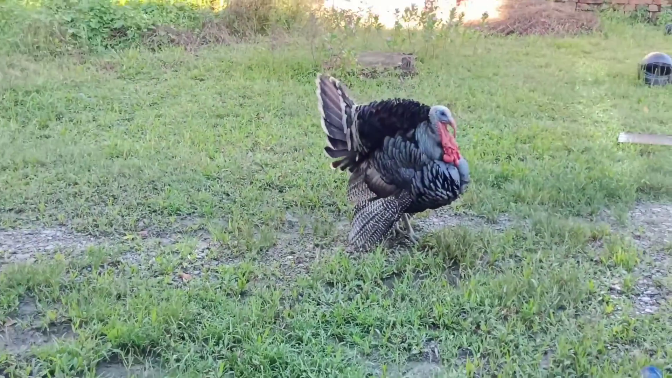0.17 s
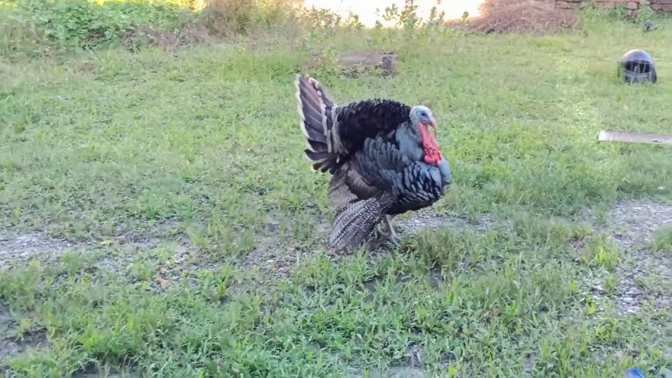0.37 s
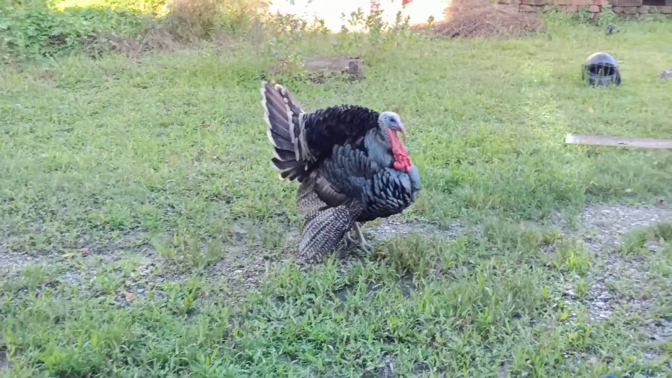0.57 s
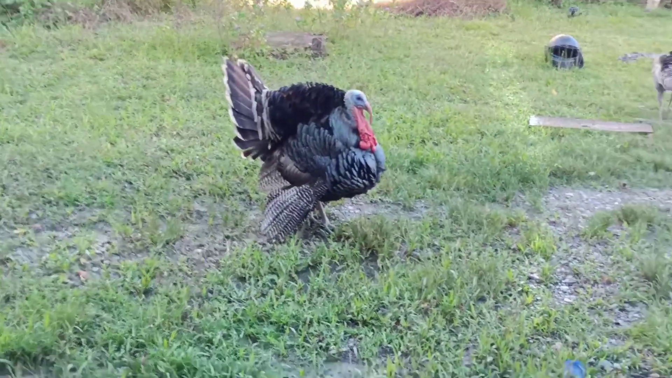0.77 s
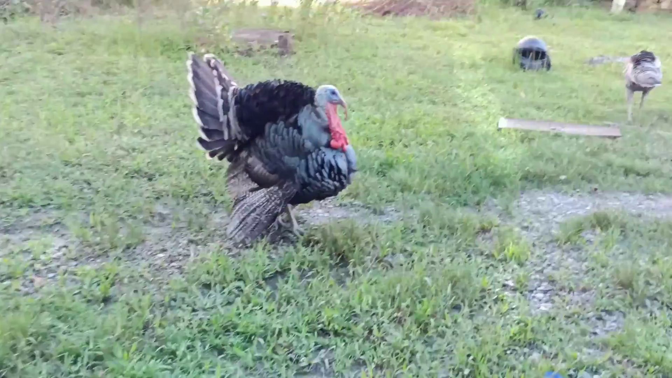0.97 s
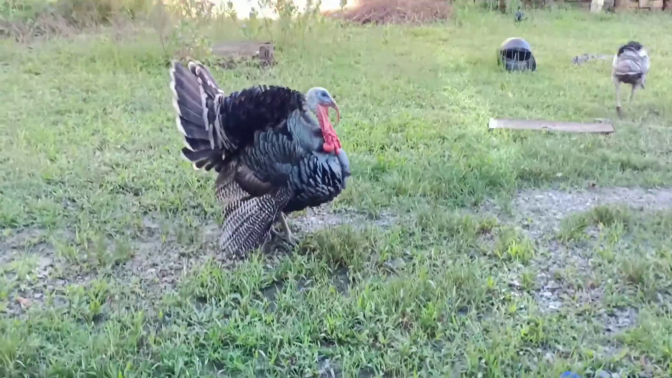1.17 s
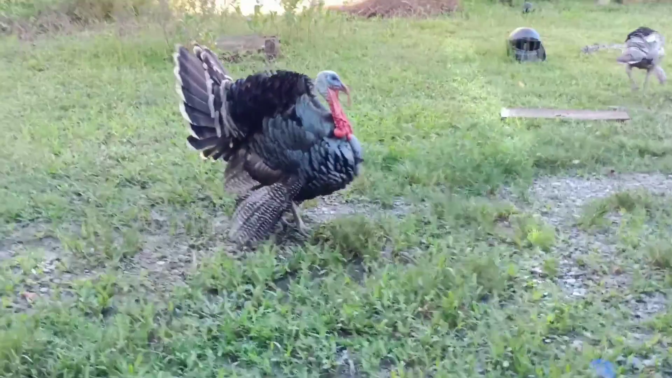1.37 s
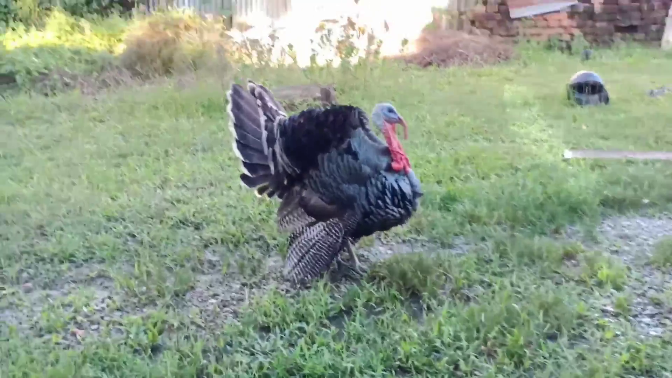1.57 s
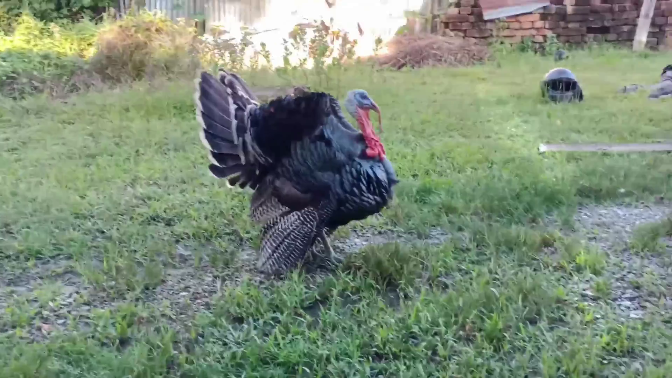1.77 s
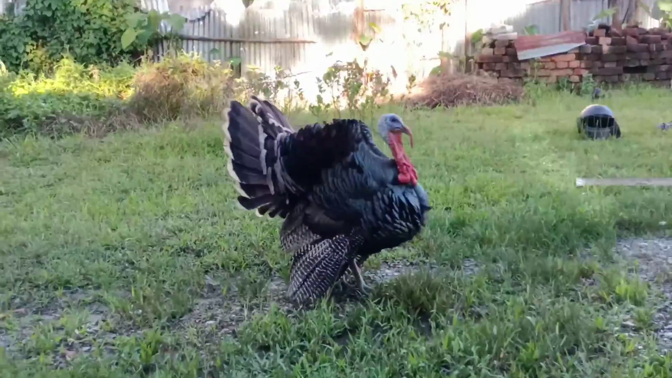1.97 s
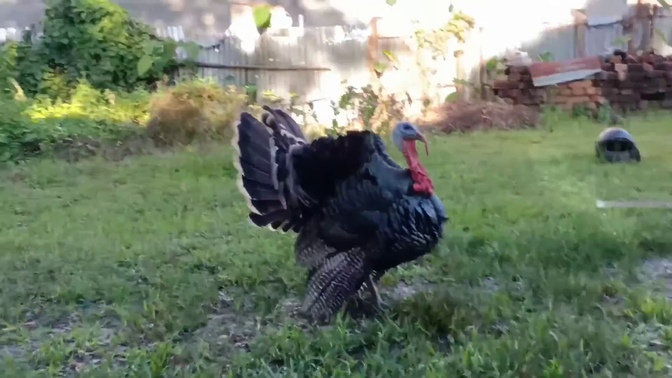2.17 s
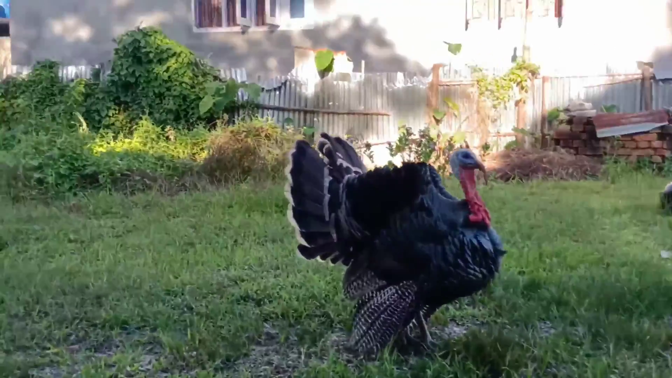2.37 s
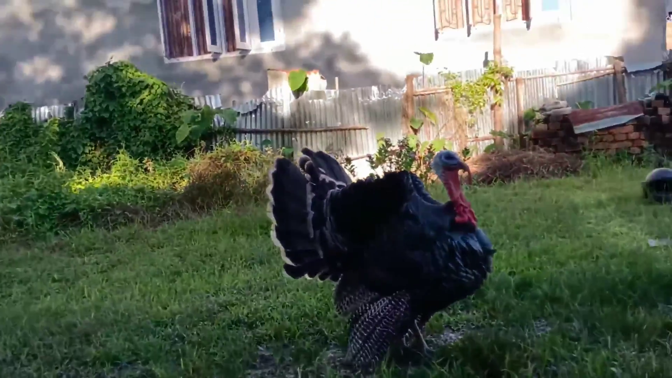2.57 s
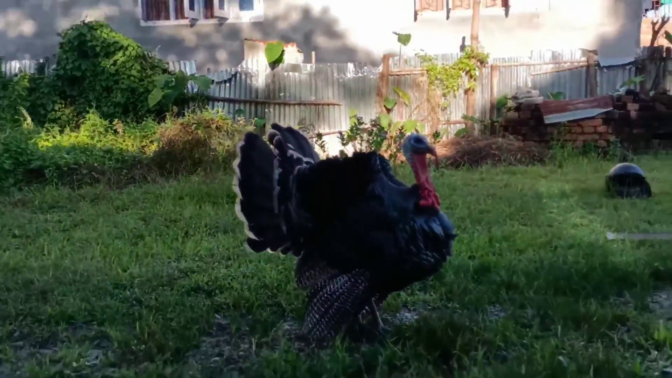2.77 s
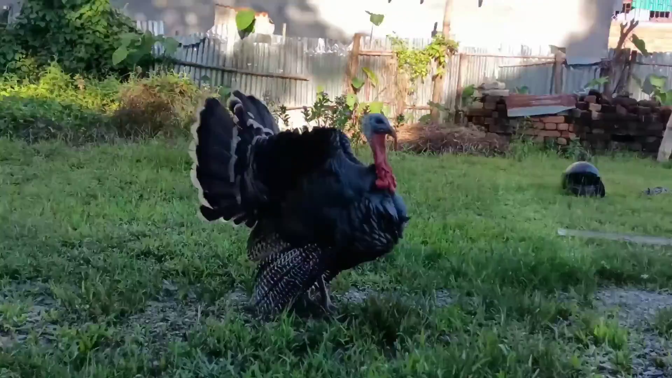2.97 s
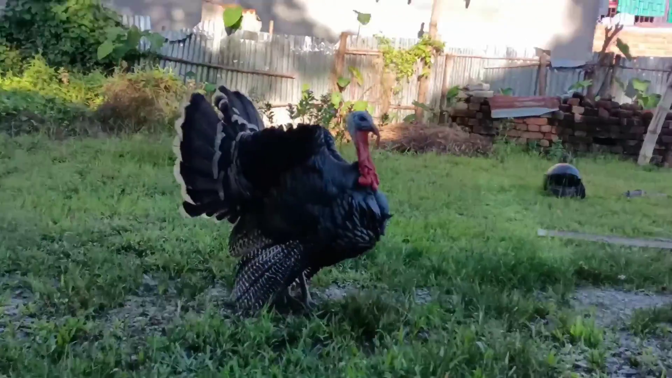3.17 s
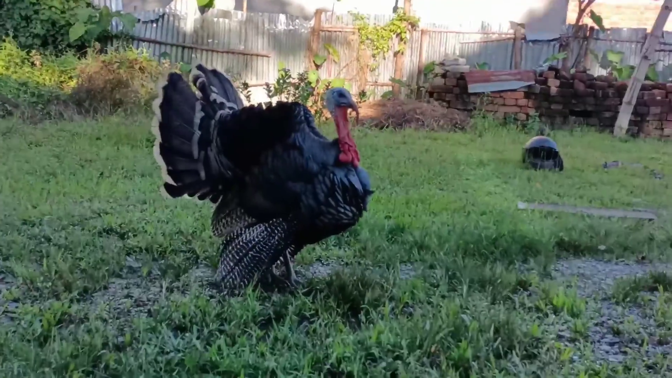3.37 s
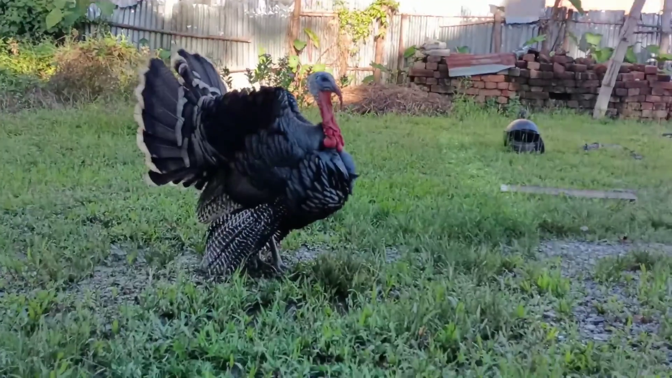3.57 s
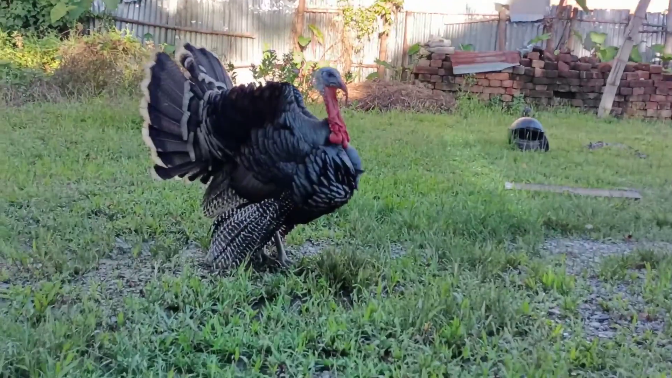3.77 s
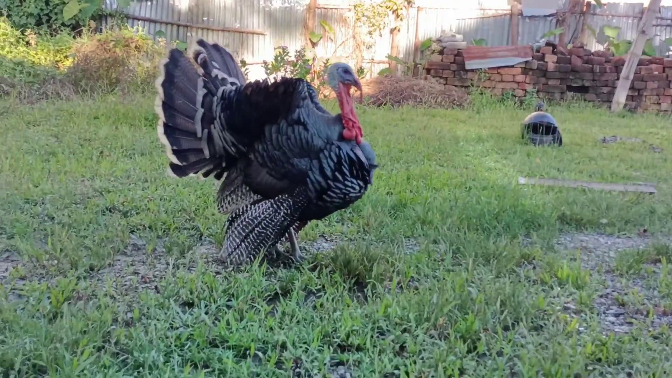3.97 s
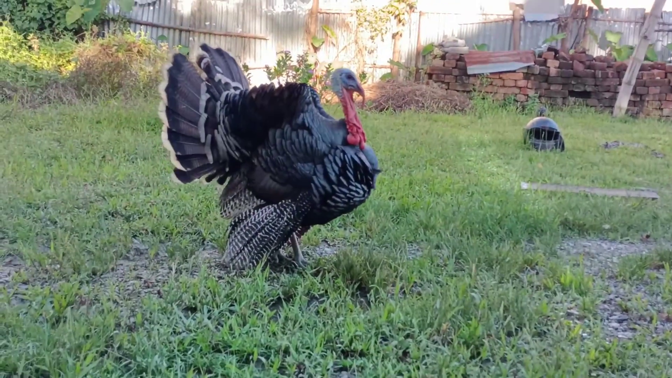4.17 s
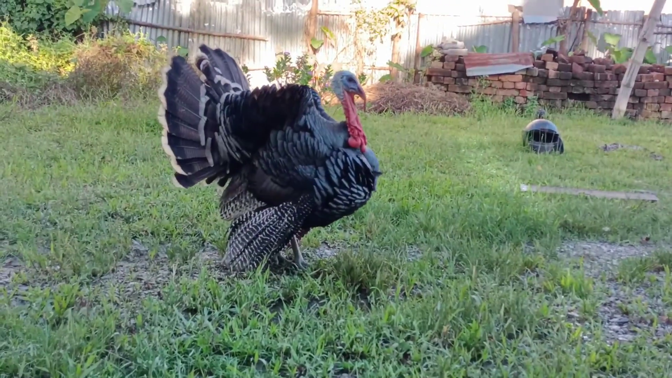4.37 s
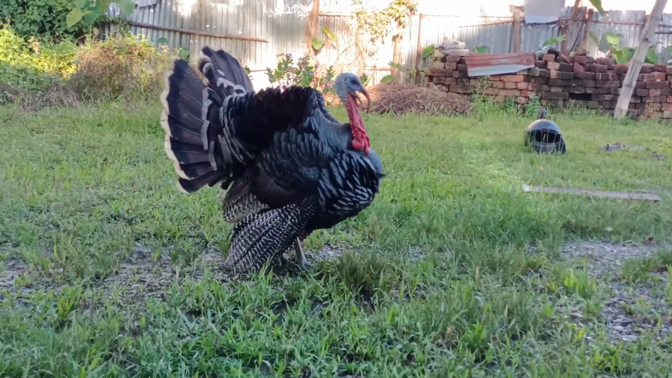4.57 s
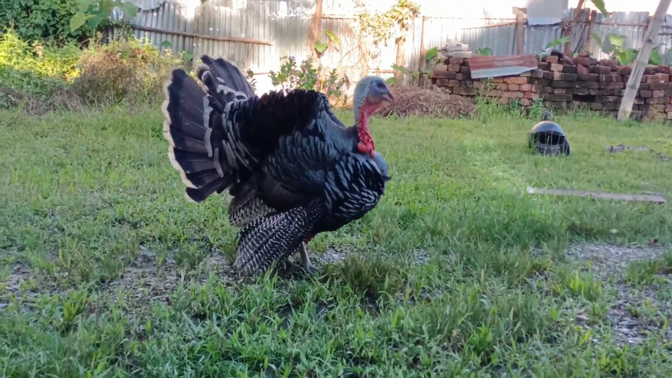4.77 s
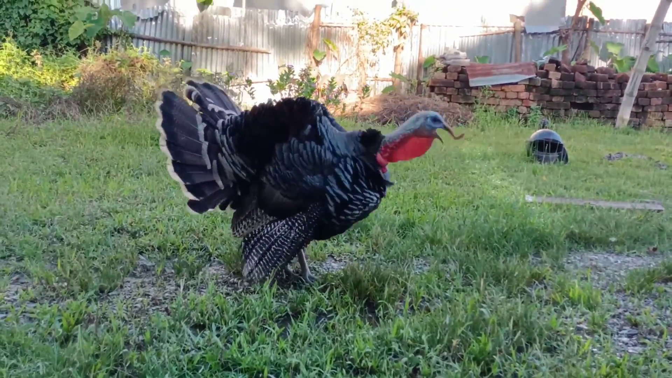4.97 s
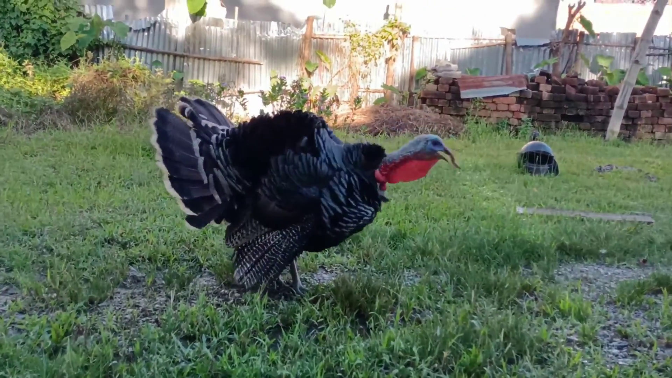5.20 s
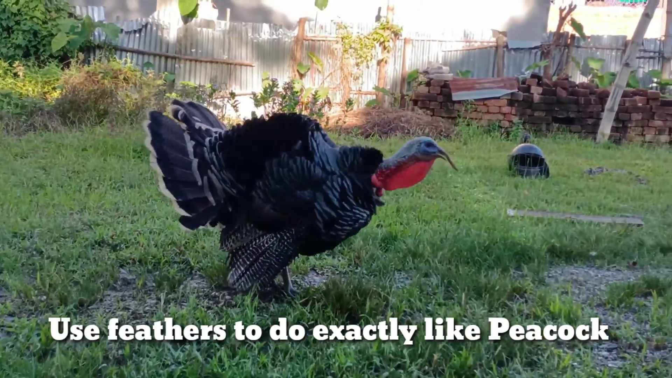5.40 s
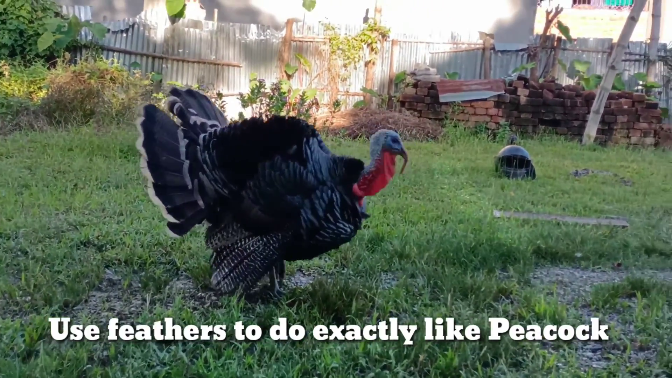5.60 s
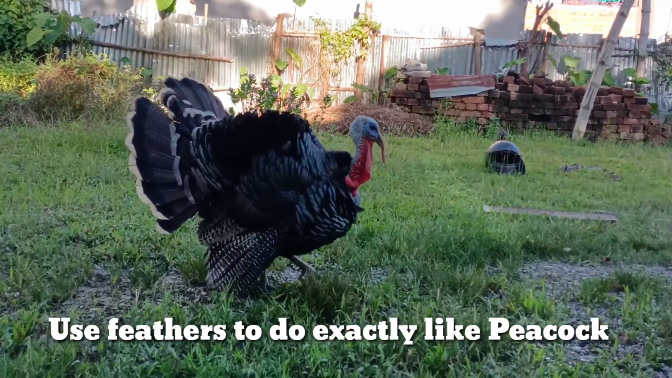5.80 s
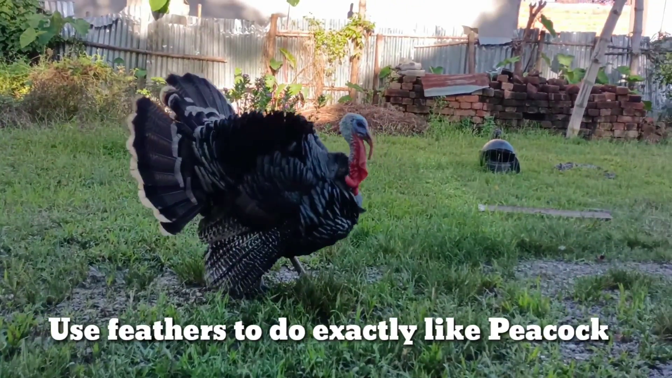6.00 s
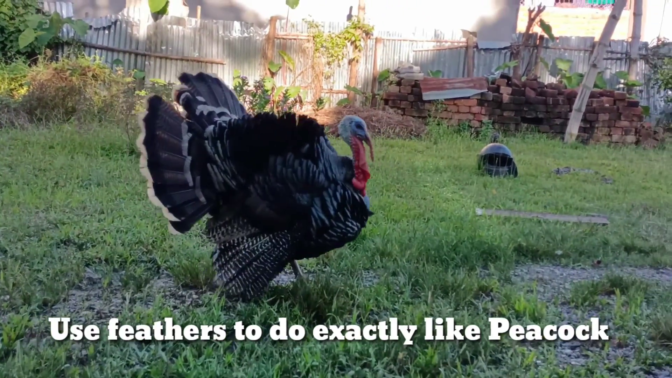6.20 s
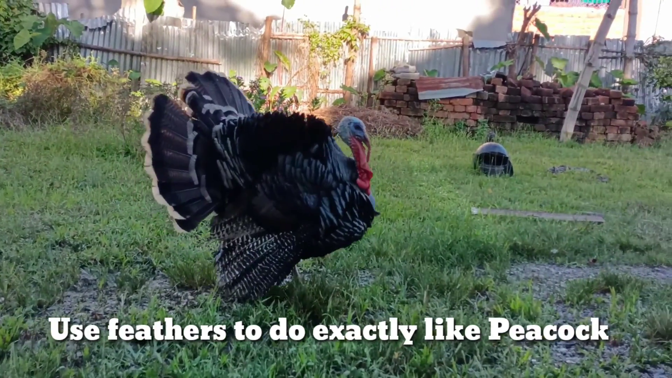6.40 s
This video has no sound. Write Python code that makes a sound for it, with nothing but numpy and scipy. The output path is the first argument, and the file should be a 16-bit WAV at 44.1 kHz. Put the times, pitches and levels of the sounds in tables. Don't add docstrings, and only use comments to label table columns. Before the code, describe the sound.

A quiet open grassy yard heard through a handheld stereo phone, brighter on the right. From 0 to 2.4 seconds there is low wind, faint distant rumble, a thin steady insect hiss at left, tiny far bird whistles, and feet swishing and crunching grass, with a strong crackle on the right at 1.9. At 2.46 a very loud, dry, bright click strikes the left side. From 2.6 to 4.5 a hen turkey gives seven short yelps about 0.3 seconds apart, the first faint and high, later ones lower and fuller, falling and mostly flipping up hoarsely; small snaps and dull thumps intrude. At 4.7 a close tom erupts in a loud, rapid, throaty gobble, two rolls of syllables fading by 5.5, with short diffuse echoes. A hoarse far cry follows around 5.6, with low handling thumps, gusts and light clicks until 6.4, the background briefly subdued.

```python
import sys
import numpy as np
from scipy import signal
from scipy.fft import rfft, irfft, next_fast_len
from scipy.io import wavfile
from scipy.ndimage import uniform_filter1d, map_coordinates

SR = 44100
rng = np.random.default_rng(int(sys.argv[2]) if len(sys.argv) > 2 else 0)


def bounce(signal):
    frames = np.transpose(np.atleast_2d(signal))
    limited = np.clip(frames, -1, 1)
    pcm = np.round(limited * 32767).astype(np.int16)
    wavfile.write(sys.argv[1], SR, pcm)


def voltage_ratio(decibels):
    exponent = np.asarray(decibels, float) / 20
    return 10 ** exponent


N = 284136

# (time [s], level [dB])
GUST_LEVEL = [(0, -63.5), (.6, -71), (2.0, -68), (2.7, -62), (3.24, -56.5), (4.5, -61), (4.7, -47.5),
              (5.6, -55), (5.75, -70.5), (6.0, -52), (6.44, -63.5)]
# (time [s], level [dB])
STEPPING_LEVEL = [(0, -60.5), (.54, -57.5), (.85, -45.5), (1.16, -49), (1.41, -53), (1.7, -50.5),
                  (1.99, -47.5), (2.29, -56), (2.69, -56.5), (3.24, -63.5), (3.54, -56), (4.5, -67.5),
                  (6.44, -56)]
# (frequency [Hz], density [dB per Hz])
WIND_SPECTRUM = [(12, -10), (30, -5.5), (60, -4.5), (105, 2), (135, -3), (200, -12.5), (400, -40)]
# (frequency [Hz], density [dB per Hz])
RUMBLE_SPECTRUM = [(82, -34.5), (140, 1), (292, -1), (479, 2), (640, -6), (1170, -13), (1370, -26),
                   (1830, -13.5), (2500, -14), (3250, -30), (5500, -120)]
# (frequency [Hz], density [dB per Hz])
RUSTLE_SPECTRUM = [(710, -39.5), (1200, -12.5), (1650, -16), (1900, -17.5), (2420, -7), (4990, -11),
                   (6220, -3.5), (8000, -16.5), (10100, 1.5), (12400, -14), (14900, -18.5), (15800, -29),
                   (16500, -64)]
# (frequency [Hz], density [dB per Hz])
INSECT_SPECTRUM = [(7500, -31), (8800, -6.5), (9600, 3.5), (10300, 9), (10900, 0.5), (11500, -11.5),
                   (12800, -38)]
RUMBLE_DB, INSECT_DB = -64.5, -53
DUCK_FROM_DB, DUCK_SHARE, DUCK_RECOVER_DB_PER_S = -51, 0.11, 12.5

# (frequency [Hz], left minus right [dB])
PORT_DIFFERENCE = [(200, 0.5), (1200, 0.5), (2500, -3), (4000, -9), (6000, -20), (7500, -6), (10000, 13.5),
                   (15000, -16)]
# (frequency [Hz], gain [dB])
HOUSING_RING = [(1000, 0.5), (4500, -6.5), (6100, 2), (7600, -13), (9400, -3.5), (13000, -11), (16000, 1)]

# (start [s], length [s], frequency [Hz], level
# [dB])
FAR_WHISTLES = [(2.62, .14, 2060, -70), (.66, .18, 1660, -72), (1.19, .14, 1660, -74),
                (1.23, .07, 2500, -73), (.24, .11, 1220, -72), (.36, .05, 1125, -71), (.32, .12, 1670, -77),
                (.35, .07, 2550, -73), (2.22, .12, 2530, -71), (.17, .06, 5600, -69), (.18, .05, 4350, -67),
                (2.515, .07, 1275, -66)]
# (start [s], length [s], start frequency [Hz], level [dB])
FAR_CRIES = [
    (1.39, .35, 3050, -65),
    (3.78, .27, 3450, -59),
    (5.55, .24, 3650, -62),
    (5.48, .22, 5200, -66),
]
# (start [s], length [s], level [dB])
GRASS_SWISHES = [
    (1.13, .12, -59),
    (1.85, .15, -58),
    (0, .07, -63),
]
WHISTLE_SAG, CRY_SAG = .985, .83
WHISTLE_BLUR, CRY_BLUR = .025, .33
SWISH_HZ = 5600

# (time [s], peak [dB], frequency [Hz],
# swell [s])
LOW_THUMPS = [(1.351, -62, 197, 0.0087), (1.531, -57, 184, 0.0093), (2.005, -61.5, 108, 0.0167),
              (2.169, -48.5, 115, 0.0066), (2.47, -41, 129, 0.0087), (2.546, -52.5, 111, 0.0375),
              (2.716, -60, 116, 0.0124), (2.872, -68, 121, 0.0186), (3.203, -59.5, 208.7, 0.0059),
              (3.205, -46, 101, 0.0072), (3.409, -42.5, 100, 0.0071), (4.079, -42.5, 124, 0.0106),
              (4.472, -58, 134, 0.0086), (4.682, -33.5, 111, 0.0112), (4.979, -32, 108, 0.0147),
              (5.175, -32.5, 78.1, 0.0096), (5.396, -36, 118, 0.01085), (5.659, -50.5, 97, 0.013),
              (5.728, -51.5, 104.6, 0.0158), (5.926, -34, 134, 0.00455), (6.002, -44.5, 102, 0.01013),
              (6.18, -52.5, 116.3, 0.013)]
# (time [s], peak [dB], left minus right [dB], low edge [Hz], high edge [Hz])
DRY_SNAPS = [(0.598, -54, -19.5, 100, 1480), (1.498, -38.5, -32, 5450, 13140),
             (2.459, -1.5, 14, 5710, 13010), (2.4587, -19.5, -16, 2873, 4900),
             (2.8874, -33.5, -28, 30.3, 1590), (2.8871, -31.5, -35.5, 4200, 14400),
             (3.1581, -35, -30, 60, 8720), (3.254, -36, 19.5, 150, 1480), (3.3829, -23, -28.5, 9070, 15970),
             (3.383, -38.5, 14.5, 2000, 7000), (3.46, -49, 10, 500, 2900), (4.329, -44, -26.5, 300, 6800),
             (5.932, -56, 10.5, 101.7, 672), (6.28, -44.5, -1, 4960, 14630),
             (6.347, -48.5, -9.5, 3937, 14800)]
# (time [s], peak [dB], low edge [Hz], high edge [Hz], T60 [s])
GRASS_CRUNCHES = [
    (0.2121, -36, 3080, 8840, 0.082),
    (0.646, -44, 2660, 7700, 0.038),
    (1.55, -43, 200, 5220, 0.111),
    (1.58, -43.5, 900, 15060, 0.061),
    (1.91, -17.5, 3155, 8150, 0.0287),
    (1.931, -32.5, 305, 6740, 0.118),
    (1.96, -42.5, 422, 1500, 0.026),
    (2.287, -46, 1500, 6980, 0.032),
    (2.482, -36, 4540, 15260, 0.077),
    (5.236, -38.5, 86.5, 347, 0.31),
]
SNAP_T60_S, CRUNCH_PAN_DB = 0.00631, -15.5

YARD_T60_S, YARD_DB = 0.4123, -10
GROUND_T60_S, GROUND_DB = 0.0562, -2

ANCHOR_PARTIALS = [1, 2, 4.0, 8.5]

# (start [s], length [s], peak [dB], start frequency [Hz], lowest frequency [Hz])
HEN_YELPS = [
    (2.568, 0.1445, -50, 1212, 1001),
    (2.894, 0.123, -40, 1280, 972.6),
    (3.168, 0.1409, -35, 964.2, 805.5),
    (3.455, 0.1379, -33, 958.4, 808.5),
    (3.758, 0.1435, -36.5, 995.4, 819.3),
    (4.068, 0.1307, -37, 995.1, 853.4),
    (4.382, .105, -38, 993.3, 902.8),
]
# (share of its length, chest, throat, mouth, rasp, half pitch; each re peak [dB])
YELP_COURSE = [
    (0, -16.5, -41, -28.5, -58.5, -31),
    (.19, -6.5, -19.5, -28, -31.5, -38.5),
    (.26, -6.5, -8, -14, -15.5, -49.5),
    (.7, 1.5, -21, -15, -20, -10),
    (1, -18, -20.5, -36.5, -30, -49.5),
]
# (frequency [Hz], gain [dB])
HEN_RESONANCES = [(1500, -4.5), (3300, 2), (4200, -12), (5000, -5.5), (5450, 10), (5900, -9), (6500, -5.5),
                  (8000, -35), (10000, -31), (16000, -44.5)]
FALL_HZ_PER_S, THIN_FALL_HZ_PER_S, SETTLE_HZ, REBOUND = 2000, 5500, 12, .02
THIN_ABOVE_HZ, THIN_DB_PER_OCTAVE, THIN_EVEN = 1057, 60, .5
HEN_HOARSE_END, HEN_HOARSE_THIN, HOARSE_PER_FALL, CLEAR_FALL = 1.3, .65, 13, 1.06
CLEAR_HALF_DB = 17.5
FLIP_AT, FLIP_S, FLIP_RATIO, FLIP_HZ, FLIP_DB = 0.62, 0.0809, 1.16, 1126.8, -13

# (start [s], end [s], peak [dB], start frequency [Hz], end frequency [Hz])
TOM_SYLLABLES = [(4.689, 4.749, -14, 646.2, 493), (4.747, 4.798, -28.5, 791.3, 797.6),
                 (4.799, 4.88, -4.5, 588, 720.7), (4.874, 4.941, -17, 731.4, 667.2),
                 (4.948, 5.01, -26, 714.6, 666.4), (5.001, 5.029, -18, 685.2, 591),
                 (5.031, 5.074, -11, 671.6, 581), (5.065, 5.122, -7, 599.8, 684.8),
                 (5.126, 5.161, -9.5, 684.7, 665.2), (5.168, 5.226, -24, 605.5, 503),
                 (5.223, 5.297, -26.5, 620.3, 510.5), (5.311, 5.338, -15, 566.6, 633),
                 (5.331, 5.4, -15, 628.5, 559.6), (5.4, 5.443, -28, 583.8, 506.7),
                 (5.438, 5.475, -36, 583.5, 501.3), (5.479, 5.55, -56, 633.1, 590.6)]
# (time [s], resonance of the gape [Hz], strain on the rasp [dB])
BEAK_GAPE = [
    [(4.70, 2581, -11), (4.74, 1507, -15), (4.80, 2300, -20), (4.835, 2133, -18), (4.866, 1296, -12.5),
     (4.89, 1225, 4), (4.93, 794, -10), (4.995, 855, -8.5)],
    [(5.01, 1303, -12.5), (5.026, 800, -15.5), (5.044, 1287, -26), (5.075, 1900, -13), (5.11, 1210, -8),
     (5.14, 648, -11.5), (5.25, 1007, -16), (5.335, 1107, -9.5), (5.41, 756, -16.5)],
]
# (frequency [Hz], gain [dB])
TOM_RESONANCES = [(1500, 0.5), (1900, 1), (2350, 5.5), (2950, 6), (3600, 6), (4600, -8.5), (5600, 0.5),
                  (6700, -11.5), (7700, -24.5), (9300, -22.5), (14900, -26), (16000, -29.5)]
SWELL_DB, RISE_FROM, RISE_TO = 12.5, .37, .88
ONSET_S, ONSET_DB, DYING_S, MURMUR_DB = .012, 10, 0.0515, -43.5
GAPE_DB_PER_OCTAVE, GAPE_DEPTH_DB, MOUTH_DB = 17, 23, -3
SAC_DB, SAC_FOLLOWS = -17, .5
TOM_CLEAR_DB, TOM_BARK_DB = -8, -34


def rms_one(x):
    return x / np.sqrt(np.mean(x ** 2) + 1e-20)


def at_hz(points, hz):
    table = np.array(points)
    return np.interp(np.log(hz + 1), np.log(table[:, 0]), table[:, 1])


def in_time(rows, t):
    s, *columns = np.transpose(rows)
    return [np.interp(t, s, column) for column in columns]


def colour(x, points, share=1):
    size = next_fast_len(N + 4096)
    hz = np.arange(size // 2 + 1) * SR / size
    return irfft(rfft(x, size) * voltage_ratio(share * at_hz(points, hz)), size)[..., :N]


def drift(rate, count=N):
    knots = rng.standard_normal(int(count * rate / SR) + 3)
    return map_coordinates(knots, [np.arange(count) * rate / SR], order=3)


def ports(x):
    left, right = x * np.ones((2, 1))
    return np.array([colour(left, PORT_DIFFERENCE, share=0.87), colour(right, PORT_DIFFERENCE, share=-0.2902)])


def wind():
    gust_db, = in_time(GUST_LEVEL, np.arange(N) / SR)
    turbulence = rng.standard_normal(N) + .45 * rng.standard_normal((2, N))
    return rms_one(colour(turbulence, WIND_SPECTRUM)) * voltage_ratio(gust_db + 3 * drift(16))


def rumble():
    noise = rng.standard_normal(N) + 0.73 * rng.standard_normal((2, N))
    return rms_one(colour(noise, RUMBLE_SPECTRUM)) * voltage_ratio(RUMBLE_DB + 2.8 * drift(3.3))


def rustle():
    step_db, = in_time(STEPPING_LEVEL, np.arange(N) / SR)
    grains = rng.standard_normal((2, N)) * voltage_ratio(2.2 * drift(3.6) + 1.3 * drift(800))
    grass = rms_one(colour(grains, RUSTLE_SPECTRUM)) * voltage_ratio(step_db - 3.5)
    return colour(ports(grass), [(8000, -0.5), (9200, -35.5), (11200, -19.0), (12200, 2.5)])


def insects():
    side_db = np.array([[5.0], [-10.5]])
    chorus = rms_one(colour(rng.standard_normal((2, N)), INSECT_SPECTRUM))
    return chorus * voltage_ratio(INSECT_DB + 0.47 * drift(12) + side_db)


def background():
    return wind() + rumble() + rustle() + insects()


def ducking(x):
    level_db = 10 * np.log10(uniform_filter1d(x ** 2, size=800) + 1e-9)
    back_db = DUCK_RECOVER_DB_PER_S * np.arange(N) / SR
    held_db = np.maximum.accumulate(level_db + back_db) - back_db
    return -DUCK_SHARE * np.clip(held_db - DUCK_FROM_DB, 0, 60)


def breathy(table):
    out = np.zeros(N)
    for start, length, from_hz, to_hz, level_db, width_hz in table:
        at = np.arange(int(start * SR), int((start + length) * SR))
        u = np.linspace(0, 1, len(at))
        phase = 2 * np.pi * np.cumsum(from_hz + (to_hz - from_hz) * u) / SR
        clear = np.exp(-width_hz / 60)
        chop, chop_late, patches = [drift(rate, count=len(at)) for rate in (width_hz, width_hz, 45)]
        band = (clear + (1 - clear) * chop) * np.sin(phase)
        band = band + (1 - clear) * chop_late * np.cos(phase)
        out[at] += voltage_ratio(level_db + 3.5 * patches) * np.sin(np.pi * u ** .8) * band
    return out


def far_sounds():
    whistles = [(s, length, hz, WHISTLE_SAG * hz, db, WHISTLE_BLUR * hz) for s, length, hz, db in FAR_WHISTLES]
    cries = [(s, length, hz, CRY_SAG * hz, db, CRY_BLUR * hz) for s, length, hz, db in FAR_CRIES]
    swishes = [(s, length, SWISH_HZ, SWISH_HZ, db, SWISH_HZ) for s, length, db in GRASS_SWISHES]
    return breathy(whistles + cries + swishes)


def thumps():
    out, t = np.zeros(N + 8000), np.arange(8000) / SR
    for s, peak_db, hz, swell in LOW_THUMPS:
        envelope = (t / swell) * np.exp(1 - t / swell)
        i = int(s * SR)
        out[i:i + 8000] += voltage_ratio(peak_db) * np.sin(2 * np.pi * hz * t) * envelope
    return out[:N]


def snaps():
    out, t = np.zeros((2, N)), np.arange(3000) / SR
    rows = [row + (SNAP_T60_S,) for row in DRY_SNAPS]
    for s, peak_db, low_hz, high_hz, t60 in GRASS_CRUNCHES:
        pan_db = CRUNCH_PAN_DB * (high_hz > 1000)
        rows.append((s, peak_db, pan_db, low_hz, high_hz, t60))
    for s, peak_db, pan_db, low_hz, high_hz, t60 in rows:
        band = signal.butter(4, [low_hz, high_hz], "band", fs=SR, output="sos")
        burst = signal.sosfilt(band, rng.standard_normal(3000) * voltage_ratio(-60 * t / t60))
        side_db = np.array([[.5], [-.5]]) * pan_db
        i = int(s * SR)
        out[:, i:i + 3000] += voltage_ratio(peak_db + side_db) * burst / np.abs(burst).max()
    return colour(out, HOUSING_RING)


def yard(x):
    t = np.arange(int(.9 * SR)) / SR
    white = rng.standard_normal((2, len(t)))
    dull = signal.sosfilt(signal.butter(2, 1600, fs=SR, output="sos"), white)
    cloud = dull * voltage_ratio(-60 * t / YARD_T60_S)
    cloud = cloud + 1.1 * (white - dull) * voltage_ratio(-60 * t / (1.043 * YARD_T60_S))
    cloud = voltage_ratio(YARD_DB - 27.5) * cloud * np.clip((t - .004) / 0.028, 0, 1)
    cloud = cloud + voltage_ratio(GROUND_DB - 19.5) * white[:, ::-1] * voltage_ratio(-60 * t / GROUND_T60_S)
    return signal.fftconvolve(x[None], cloud, axes=1)[:, :N]


def voice(notes, throat, jitter, flutter_db, breath, edge_s):
    out = np.zeros(N)
    for t, hz, rough, levels in notes:
        at = np.round(t * SR).astype(int)
        hz = hz * (1 + jitter * rough * drift(220, count=len(at)))
        phase = 2 * np.pi * np.cumsum(hz) / SR
        note = 0
        for k in range(1, 28):
            weights = [np.interp(k, ANCHOR_PARTIALS, row) for row in np.eye(4)]
            level_db = sum(w * v for w, v in zip(weights, levels))
            level_db = level_db + (k > 2) * (at_hz(throat, k * hz) - 5.5)
            level_db = level_db + flutter_db * (.3 + rough) * drift(80, count=len(at))
            shake = breath * rough * np.sqrt(k - .97) * drift(600, count=len(at))
            partial = np.sin(k * phase + shake + rng.uniform(0, 5.25))
            note = note + voltage_ratio(level_db) * partial * (k * hz < 16000)
        note = note * voltage_ratio(4.0 * rough * drift(90, count=len(at)))
        if len(levels) > 4:
            note = note + voltage_ratio(levels[4] - 1.5) * (np.sin(phase / 2) + .6 * np.sin(1.5 * phase))
        edges = np.clip(np.minimum(t - t[0], t[-1] - t) / edge_s, 0, 1)
        out[at] += np.sqrt(2) * note * edges
    return out


def flips():
    slides = []
    for start, length, peak_db, _, low_hz in HEN_YELPS[1:]:
        slides.append((start + FLIP_AT * length, FLIP_S, FLIP_RATIO * low_hz, FLIP_HZ, peak_db + FLIP_DB, 150))
    return breathy(slides)


def yelps():
    notes = []
    for start, length, peak_db, from_hz, low_hz in HEN_YELPS:
        t = np.arange(int(start * SR), int((start + length) * SR)) / SR
        u = np.linspace(0, 1, len(t))
        thin = from_hz > THIN_ABOVE_HZ
        fall = from_hz / low_hz
        above = from_hz - low_hz - (THIN_FALL_HZ_PER_S if thin else FALL_HZ_PER_S) * (t - start)
        hz = low_hz * (1 + REBOUND * u ** 3) + SETTLE_HZ * np.logaddexp(0, above / SETTLE_HZ)
        thin_db = THIN_DB_PER_OCTAVE * max(np.log2(from_hz / THIN_ABOVE_HZ), 0)
        chest, *upper = in_time(YELP_COURSE, u)
        upper[3] = upper[3] - CLEAR_HALF_DB * (fall < 1.12)
        first = HEN_HOARSE_THIN * thin
        last = np.clip(HOARSE_PER_FALL * (fall - CLEAR_FALL), 0, HEN_HOARSE_END)
        rough = first + (last - first) * u ** 1.5
        chest_db = peak_db + chest * (THIN_EVEN if thin else 1)
        notes.append((t, hz, rough, [chest_db] + [peak_db + v - thin_db for v in upper]))
    return voice(notes, HEN_RESONANCES, jitter=.008, flutter_db=3, breath=.5, edge_s=.012)


def gobble():
    notes = []
    for start, end, peak_db, from_hz, to_hz in TOM_SYLLABLES:
        t = np.arange(int(start * SR), int(end * SR)) / SR
        u, age = np.linspace(0, 1, len(t)), t - start
        if to_hz > from_hz:
            level_db = peak_db - SWELL_DB * (1 - u)
            u = np.clip((u - RISE_FROM) / (RISE_TO - RISE_FROM), 0, 1)
        else:
            onset_db = ONSET_DB * np.clip(1 - age / ONSET_S, 0, 1)
            dying = 1 - np.exp(-np.clip(age - ONSET_S, 0, 1) / DYING_S)
            level_db = peak_db - onset_db - max(peak_db - MURMUR_DB, 6) * dying
        hz = from_hz + (to_hz - from_hz) * u
        gape_hz, strain_db = in_time(BEAK_GAPE[0] + BEAK_GAPE[1], t)
        near = []
        for k in ANCHOR_PARTIALS[:3]:
            octaves = np.abs(np.log2(k * hz / gape_hz))
            near.append(level_db - np.minimum(GAPE_DB_PER_OCTAVE * octaves, GAPE_DEPTH_DB))
        rough = np.clip((level_db - TOM_CLEAR_DB) / (TOM_BARK_DB - TOM_CLEAR_DB), .2, 1)
        sac = SAC_FOLLOWS * near[0] + SAC_DB
        notes.append((t, hz, rough, [sac, near[1], near[2] + MOUTH_DB, level_db + strain_db]))
    return voice(notes, TOM_RESONANCES, jitter=.016, flutter_db=4.5, breath=.4, edge_s=.004)


def scene():
    tom = gobble()
    hen = yelps() + flips()
    far = far_sounds()
    echoes = yard(tom + voltage_ratio(4.0) * hen + voltage_ratio(9.0) * far)
    calls = ports(tom + hen + far + echoes)
    return calls + snaps() + thumps() + background() * voltage_ratio(ducking(tom + hen))


def top_cut(x):
    return signal.sosfilt(signal.butter(12, 16710, fs=SR, output="sos"), x)


def record(dry):
    mix = 0.8935 * np.tanh(dry / 1.0026)
    return top_cut(mix)


dry = scene()
out = record(dry)
bounce(out)
```